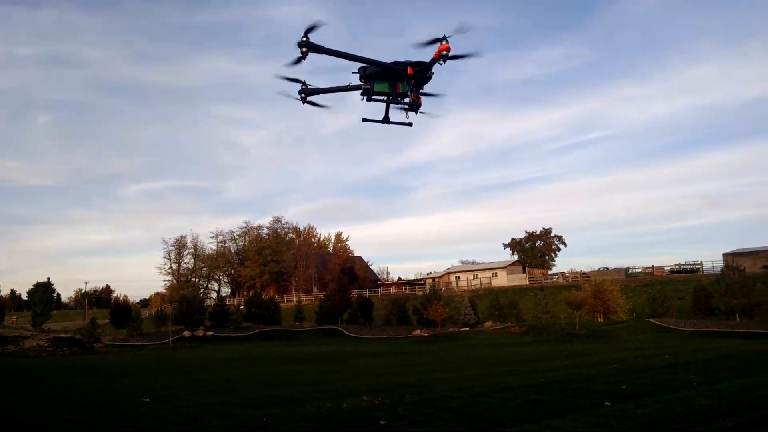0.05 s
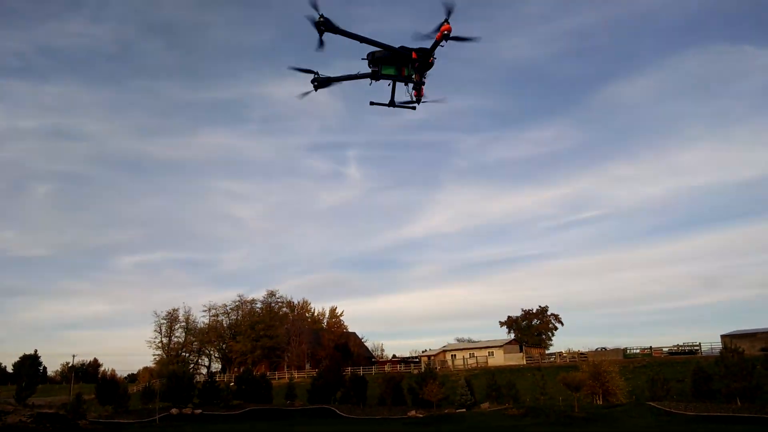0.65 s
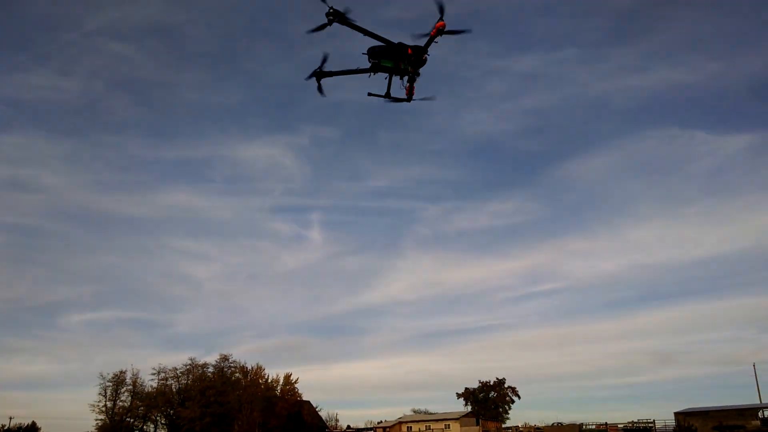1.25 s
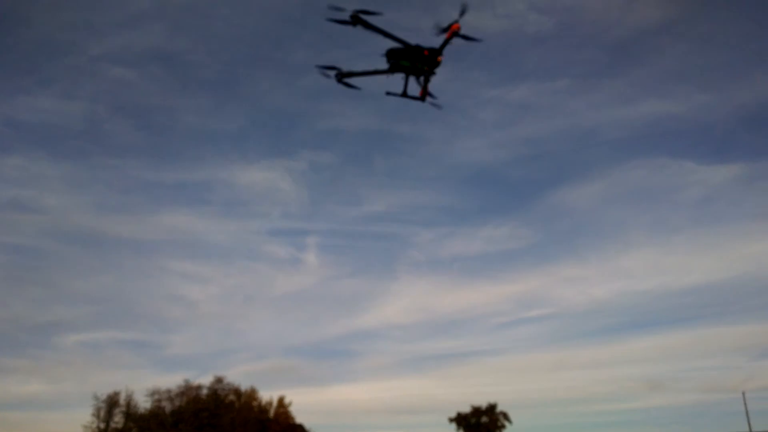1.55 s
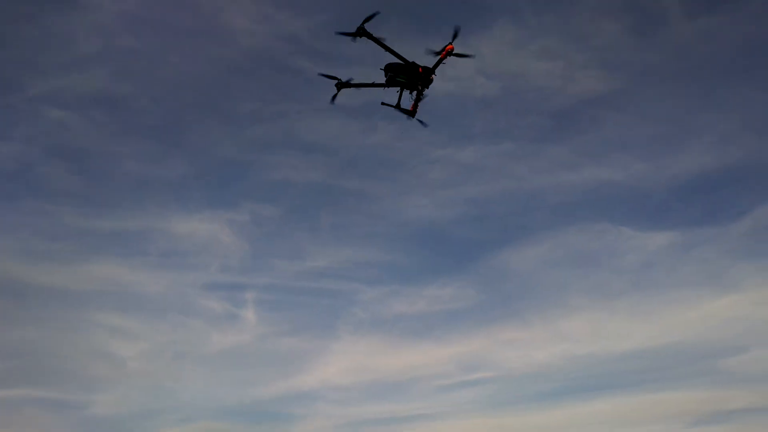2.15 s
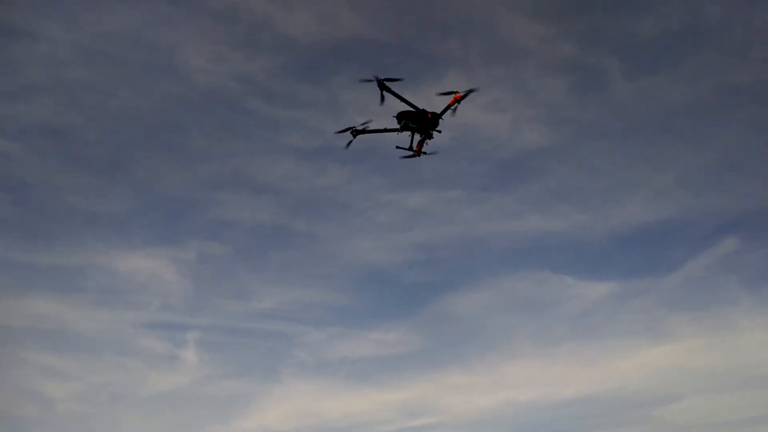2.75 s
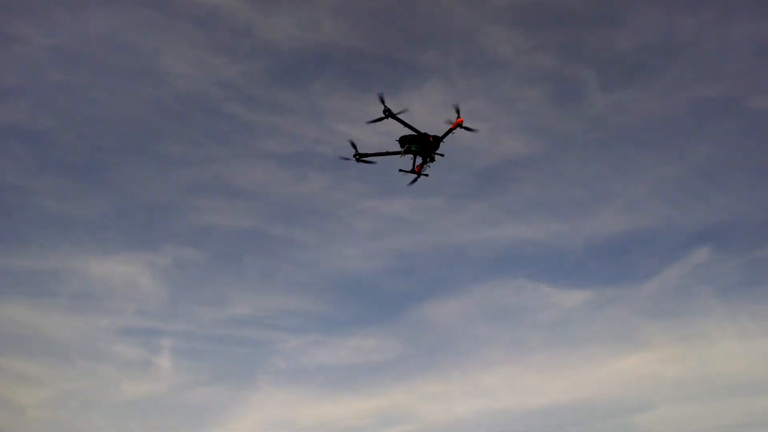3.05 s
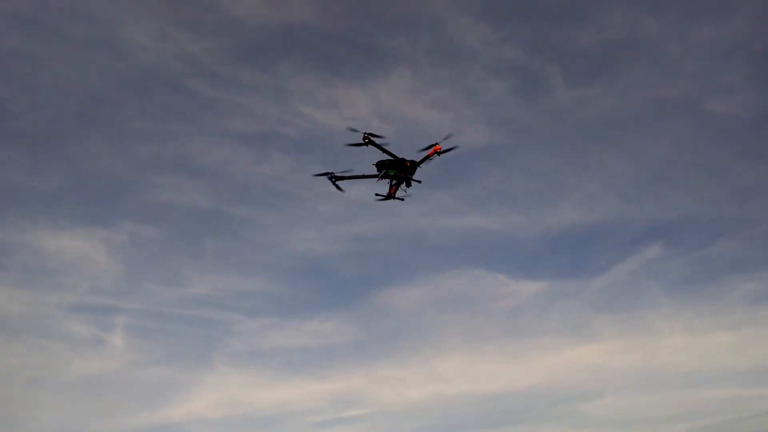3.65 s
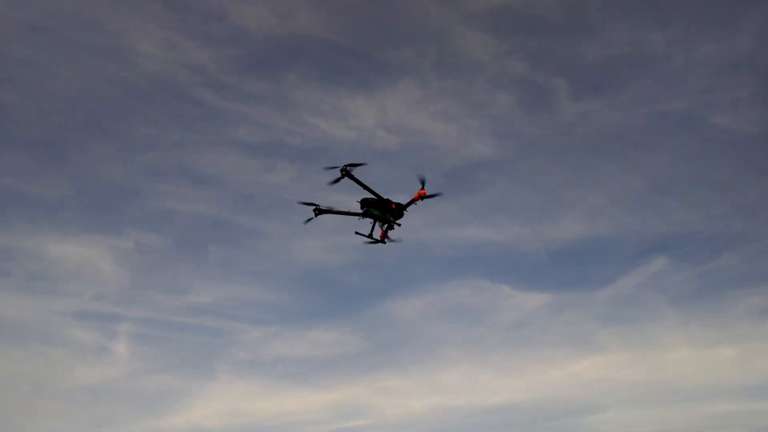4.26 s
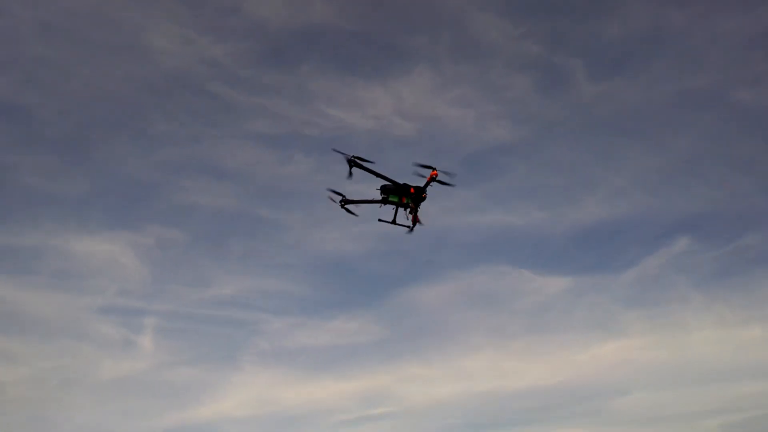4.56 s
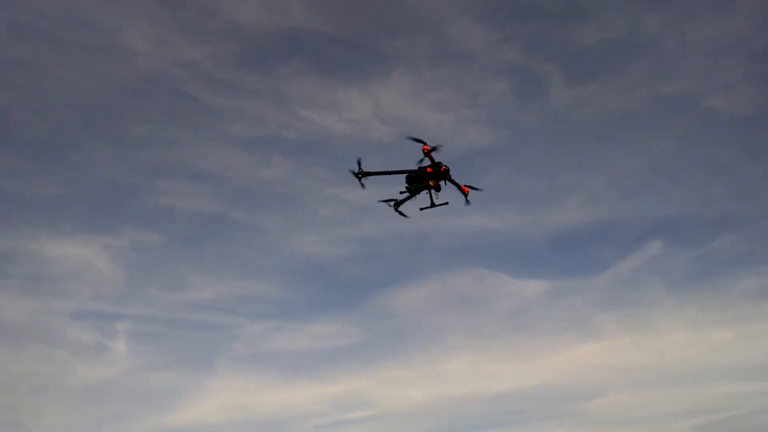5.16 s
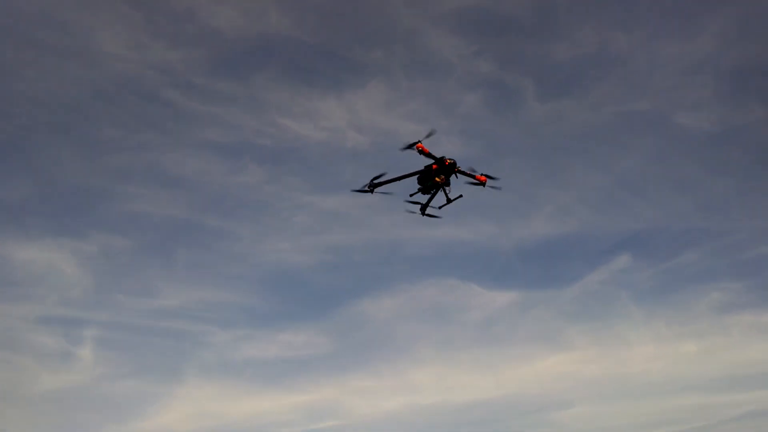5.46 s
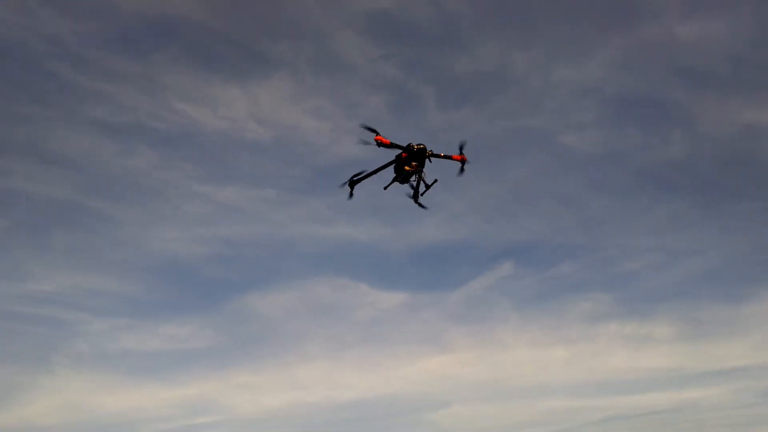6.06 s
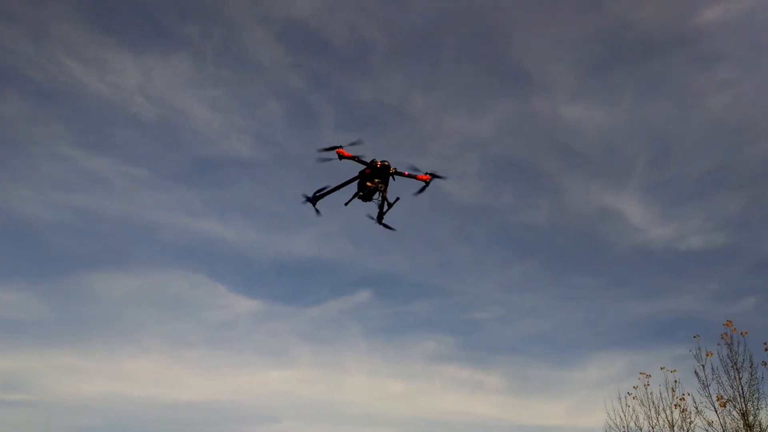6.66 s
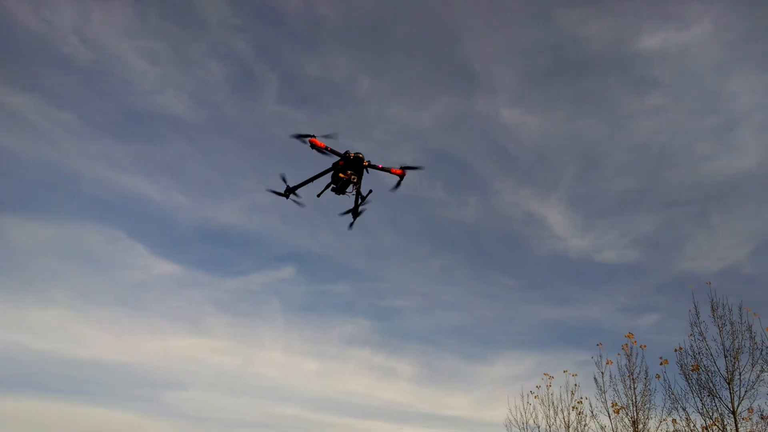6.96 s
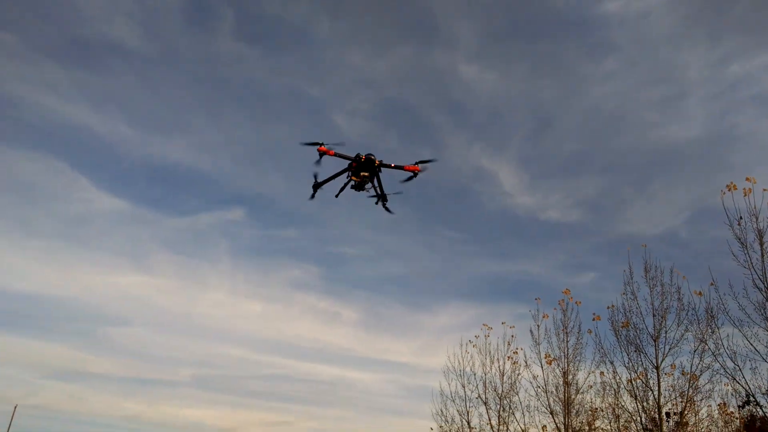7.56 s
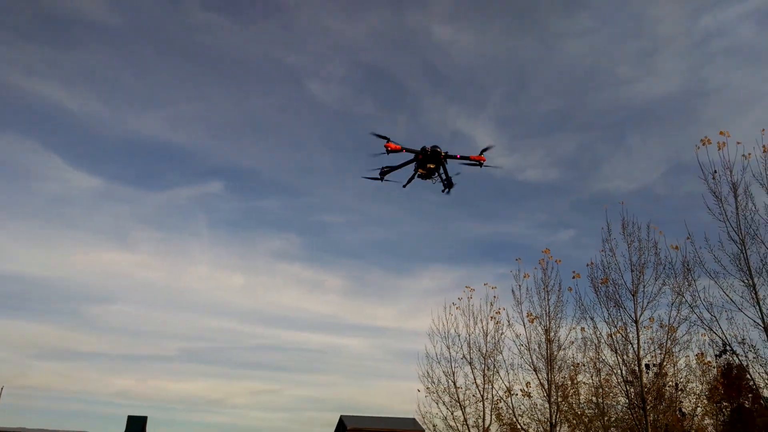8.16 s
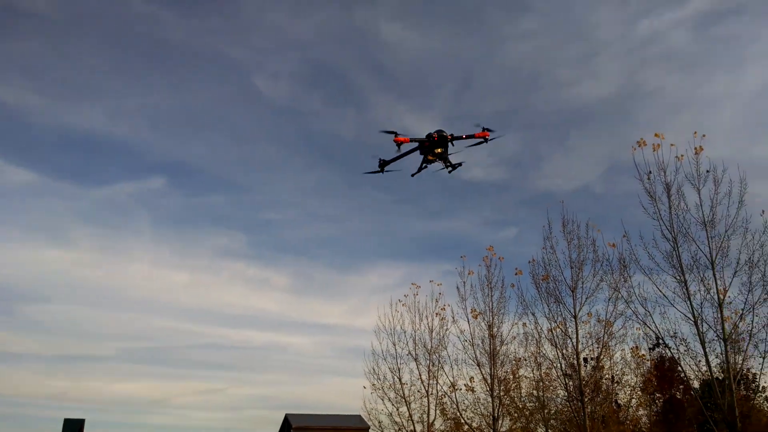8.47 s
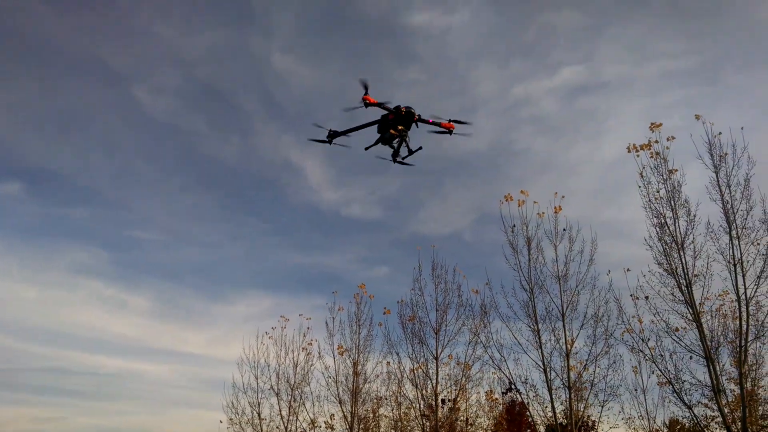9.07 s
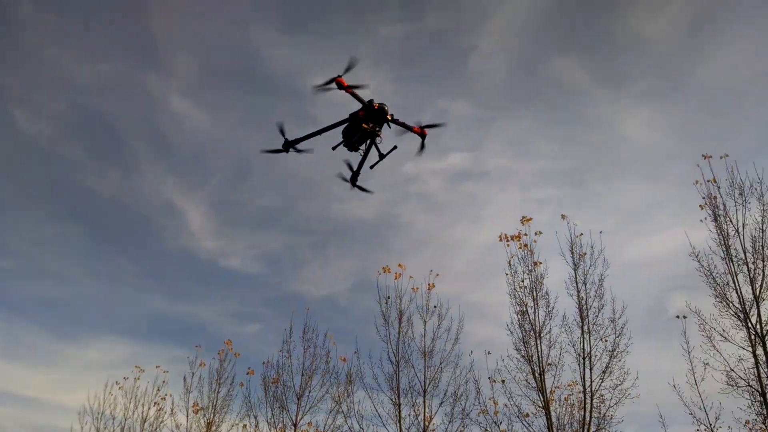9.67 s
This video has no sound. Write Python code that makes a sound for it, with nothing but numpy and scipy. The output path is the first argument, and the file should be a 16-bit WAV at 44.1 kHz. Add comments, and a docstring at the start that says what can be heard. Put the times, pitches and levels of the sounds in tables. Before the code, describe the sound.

A drone buzzes close overhead, its propellers wavering in pitch over rushing air and a thin, surging motor whine.

```python
"""Six-rotor drone over an open field

A few metres above a stereo microphone a drone manoeuvres. Its propellers buzz, beat and now and
then slap as they are steered, the wake rushes, the blade tips hiss, and the motors whine and surge
through a ringing housing. Far off, the low hum of a light aircraft sinks slowly in pitch."""
import sys
import numpy as np
from scipy import signal
from scipy.fft import rfft, irfft, next_fast_len
from scipy.io import wavfile
from scipy.ndimage import uniform_filter1d

SR = 44100
rng = np.random.default_rng(int(sys.argv[2]) if len(sys.argv) > 2 else 0)


def unload_wav(signal):
    """Save mono or channel-first audio to the path in sys.argv[1] as 16-bit WAV at rate SR, clipped to [-1, 1]."""
    wavfile.write(
        sys.argv[1],
        SR,
        np.round(np.clip(np.atleast_2d(signal).T, -1, 1) * 32767).astype(np.int16),
    )


N = 432621
T = np.arange(N) / SR

# resonances of the arms that carry the motors: (frequency [Hz], gain [dB])
ARM_RESONANCES = [(1650, -5), (1755, 14), (1795, 30), (1830, 17), (1870, -6), (2860, 7), (3500, 0),
                  (3720, 15), (3850, 13), (3980, 22), (4150, 13), (4300, -6)]


def drone(hover_hz=150, load_power=1.6, jitter_rad=0.21, hunting_hz=1.306, shudder=0.41, ragged_db=3):
    """Six rotors close overhead beat together, each with its pulses, whine and puffs of air noise."""
    # one row a rotor: (group, buzz [dB], brightness [dB/octave], odd harmonics [dB], whine [dB],
    # random drift [Hz])
    rotors = [("lead", 0, 0.45, 0, -6, 0.1001), ("slow", -1.9, 0, 0, 0, 0.059),
              ("middle", -3.5, -1.4, 0, -4.5, 0.081), ("high", -5, -1.7, -31, 1, .4),
              ("inner", -4.5, -1.1, 0, -9, .8), ("slow", -10, -0.58, 0, -15, 1.5)]
    # how much the rotors chop through their own wake: (time [s], churn [0-1])
    wake_churn = [(3.7, 0), (4.2, .9), (4.55, 0.95), (4.8, 0.31), (5.8, 0.22), (6.35, .45), (6.6, 0.11)]
    # third harmonic within the buzz: (time [s], gain [dB])
    third_gain = [(0, -1.5), (2, 0), (3, 1.5), (7, 3), (9.81, 6.5)]
    # magnetic pull in a motor, upper and lower tones: (multiple of the blade rate, level [dB])
    upper_orders = [(27, -4), (28, 5), (29, -14)]
    lower_orders = [(20.5, -10.5), (21, 2.5), (22, -20)]
    thump, hum, buzz, upper_whine, lower_whine, puffs = np.zeros((6, N))
    churn, third, rates = curves(wake_churn)[0], amp(curves(third_gain)[0]), blade_rates()
    for group, buzz_db, bright_db, odd_db, whine_db, drift_hz in rotors:
        # the inertia of the rotor rounds off each change of speed
        hz = uniform_filter1d(rates[group], size=2200) + drift_hz * wander(rate_hz=1.5)
        # in churned air the controller hunts, the pulses come early or late, and the motor shudders
        hz += hunting_hz * churn * wander(rate_hz=20.04)
        angle = 2 * np.pi * (np.cumsum(hz) / SR + rng.random())
        blade = angle + jitter_rad * churn * wander(rate_hz=25)
        shuddering = angle + shudder * (blade - angle)
        # churned air also loads each rotor unevenly and takes the edge off the faster ones
        load = amp(buzz_db + ragged_db * churn * wander(rate_hz=16)) * (hz / hover_hz) ** load_power
        edge = (hz / hover_hz - 1) * (1 - churn)
        thump += load * (hz / hover_hz) ** 2 * np.sin(blade)
        hum += amp(buzz_db) * np.sin(2 * blade)
        buzz += load * (hover_hz / hz) ** (2 * churn) * propeller(blade, edge, bright_db, odd_db, third)
        puffs += load * (np.cos(blade) + 3.1 * np.cos(2 * blade) + 0.19 * np.cos(blade / 2))
        upper_whine += amp(whine_db) * motor(angle, upper_orders, flutter=0.13)
        lower_whine += amp(whine_db) * motor(shuddering, lower_orders, flutter=0.72)
        if group == "lead":
            shake, slaps = arm_shake(angle), blade_slaps(blade)
    tones = blade_tones(thump, hum, buzz) + frame_whine(upper_whine, lower_whine)
    return tones + shake + slaps + air_rush(unit_rms(puffs), churn)


def blade_rates():
    """Blade-pass rate of each rotor group in Hz: the steered rate plus its share of the rocking."""
    # a hover, a hard turn, a gentler one, level flight, then a long turn that settles in a few swings:
    # (time [s], lead [Hz], slow [Hz], middle [Hz], high [Hz], inner [Hz])
    steering = [ (0, 158.3, 152.6, 152.5, 177.2, 155.6), (.3, 158, 153.2, 153.1, 175.2, 155.5),
                (.75, 153.1, 148.1, 150.3, 171.7, 150.2), (1.05, 152.9, 147.1, 149.9, 171.2, 152),
                (1.65, 155.7, 150.4, 154.5, 175.6, 154), (1.95, 152.5, 147.6, 150.9, 171.6, 150),
                (2.15, 152.2, 148.1, 149.3, 171.3, 149.3), (2.5, 147.5, 142.3, 144.8, 164.7, 143.1),
                (2.73, 141.2, 135.2, 139.4, 157.2, 137.9), (3.42, 149.1, 146.9, 148.3, 166.9, 145.3),
                (3.97, 150, 148.3, 149.9, 170.9, 147.1), (4.1, 156.6, 151.3, 152.8, 173.2, 154.7),
                (4.22, 174.8, 143, 145.6, 179.8, 161.8), (4.48, 182.5, 147.9, 149.2, 190, 165),
                (4.75, 169.6, 134, 138, 177, 155.6), (5.17, 164, 133, 136.6, 171.9, 151.9),
                (5.36, 147.8, 146.4, 146, 152.1, 147.2), (5.7, 150.4, 133.8, 149, 150.5, 146.9),
                (5.88, 162.2, 136.8, 142.1, 162.2, 146.7), (6.07, 165.6, 146.8, 149.6, 164.9, 146.9),
                (6.33, 154.2, 139.9, 144.7, 153.8, 146), (6.57, 144.5, 139.8, 145.9, 147.3, 143.3),
                (6.9, 150.9, 148, 151.2, 151.5, 149.1), (7.3, 153.1, 142.1, 150.8, 153.2, 145.5),
                (7.57, 151.2, 148, 150.5, 153.1, 149.5), (7.73, 168.4, 147, 148.3, 168.2, 146.9),
                (8.38, 165.2, 146.5, 145, 169, 146.1), (8.54, 165.1, 143.6, 151.3, 161.3, 145.7),
                (8.76, 157.3, 147.1, 150, 156, 147), (8.89, 160.4, 141.9, 150.5, 149.4, 145.5),
                (9.03, 154, 153, 148.9, 151.8, 149.7), (9.24, 152.1, 150.9, 149, 151.4, 149.9),
                (9.46, 145.4, 142.9, 146.9, 148.9, 145.5), (9.81, 151.3, 146.9, 152.8, 153.2, 147.8)]
    # the controller overshoots and the craft rocks: (start [s], length [s], rate [Hz], depth [Hz])
    overshoot = (7.86, .82, 3.35, 5.1)
    # rotors that are steered together: name -> share of the rocking
    groups = {"lead": 0.46, "slow": -0.81, "middle": 0.74, "high": -0.55, "inner": 0}
    start, length, rate, depth_hz = overshoot
    since = np.clip(T - start, 0, length)
    rocking = depth_hz * np.sin(np.pi * since / length) * np.sin(2 * np.pi * rate * since)
    return {name: hz + share * rocking for (name, share), hz in zip(groups.items(), curves(steering))}


def propeller(angle, edge, bright_db, odd_db, third, sharpen=0.86, gusty=0.32, uneven_db=-23):
    """Each passing blade makes a pressure pulse, sharper above hover speed; eddies shake its overtones."""
    phase = (angle % (4 * np.pi)).astype(np.float32)
    buzz = np.zeros(N)
    for k in range(3, 17):
        strength = amp(bright_db * np.log2(k / 2) + odd_db * (k % 2))
        strength *= 1 + gusty * np.sqrt(k / 2) * wander(rate_hz=12)
        strength *= third if k == 3 else 1 + sharpen * np.log2(k / 3) * edge
        buzz += strength * np.sin(k * phase + k / 10 * rng.standard_normal())
    return buzz * (1 + amp(uneven_db) * np.cos(phase / 2))  # unlike blades add half orders


def blade_tones(thump, hum, buzz, thump_trim_db=-5.5, buzz_trim_db=-0.5):
    """The blade pulses as heard from the ground: thrust thump, octave hum and the buzz above them."""
    # the two lowest blade tones: (time [s], relative thump level [dB], hum level [dB])
    low_levels = [(0, -35.5, -33.5), (2.7, -38, -35.5), (3.6, -34.5, -35), (4.45, -26.5, -30.5),
                  (5.75, -39, -33), (6.4, -34.5, -27.5), (6.7, -30, -29), (7.2, -33.5, -29),
                  (7.9, -30.5, -29.5), (9, -29, -30), (9.81, -31, -28.5)]
    # buzz beamed at the microphone as the craft tilts: (time [s], relative level [dB])
    buzz_levels = [(0, -28), (.85, -26), (1.03, -29), (1.3, -25), (2.4, -25), (2.75, -29.5), (2.9, -26),
                   (4.1, -27), (4.28, -31.5), (4.45, -27.5), (5.6, -27), (6.4, -24.5), (6.9, -24),
                   (7.2, -24.5), (7.85, -25), (8.7, -26.5), (9.42, -22.5), (9.81, -27)]
    # colours of the hum and of the buzz: (frequency [Hz], gain [dB])
    hum_colour = [(290, 0.5), (335, 7), (375, -4)]
    buzz_colour = [(300, 18), (420, -0.5), (510, 5), (590, 5), (680, 4), (745, 0.5), (840, -3), (915, -3.5),
                   (1020, -1), (1150, -4), (1800, -16.5), (2400, -8)]
    (thump_db, hum_db), (buzz_db,) = curves(low_levels), curves(buzz_levels)
    tones = amp(thump_db + thump_trim_db) * levelled(thump, seconds=0.2)
    tones += amp(hum_db) * levelled(coloured(hum, hum_colour), seconds=0.34)
    return tones + amp(buzz_db + buzz_trim_db) * levelled(coloured(buzz, buzz_colour), seconds=0.18)


def blade_slaps(blade):
    """A blade cuts its neighbour's tip vortex: short runs of sharp suction pulses, one at each pass."""
    # runs of slaps: (start [s], length [s], level [dB])
    runs = [(6.3, 0.18, -29), (6.846, 0.097, -23.5), (6.991, 0.031, -22.5), (7.041, 0.025, -20),
            (7.65, 0.66, -27), (9.02, 0.31, -30), (9.584, 0.096, -25)]
    # colour of a slap: (frequency [Hz], gain [dB])
    slap_colour = [(300, -9), (550, 4), (700, -5.5), (1000, -0.5), (1300, -15), (2400, -21)]
    level = np.zeros(N)
    for start, length, db in runs:
        add(level, start, amp(db) * swell(length, edge_s=0.014))
    phase = (blade % (2 * np.pi)).astype(np.float32)
    suction = -sum(np.cos(k * phase) for k in range(2, 16))
    return level * unit_rms(coloured(suction, slap_colour))


def air_rush(puffs, churn, wake_trim_db=4.5, tip_trim_db=6.0, eddies_db=-35):
    """The wake, struck eddies and the blade tips make turbulent noise that pulses with the blades."""
    # air noise sent to the ground, relative levels: (time [s], wake rush [dB], tip hiss [dB])
    noise_levels = [(0.1, -30, -21.5), (.21, -34, -24), (0.9, -33, -23), (1.0, -34.5, -25),
                    (1.55, -33, -23), (2.7, -33.5, -27), (3.3, -31, -27), (3.55, -34, -26),
                    (4.67, -32.5, -25), (5.63, -34.5, -28.5), (5.79, -31, -27), (6.72, -34, -24),
                    (6.91, -30, -22), (7.1, -35.5, -25), (7.54, -32.5, -23.5), (8.44, -37, -29.5),
                    (9.15, -35, -25), (9.76, -28, -22.5)]
    # colours of the wake and of eddies struck by the blades: (frequency [Hz], gain [dB])
    wake_colour = [(30, -31), (70, -26), (130, -2), (220, -16), (350, -3.5), (600, 0), (1100, 1), (1800, 4),
                   (2200, -4), (3200, -1), (4200, 3), (4600, -4.5), (8000, -55)]
    eddy_colour = [(50, -27), (120, 18), (220, -7), (400, -10), (600, -6), (1200, 13), (2500, -45)]
    wake_db, tip_db = curves(noise_levels)
    wake = amp(wake_db + wake_trim_db) * turbulence(wake_colour)
    wake += amp(eddies_db) * churn * turbulence(eddy_colour)
    tips = amp(tip_db + tip_trim_db) * tip_hiss()
    wake_swish = unit_rms(np.exp(0.195 * puffs))
    flicker = 0.089 * wander(rate_hz=17)
    tip_swish = unit_rms(np.exp(0.135 * puffs + flicker))
    return wake * wake_swish + tips * tip_swish


def tip_hiss(top_hz=11500):
    """Noise shed by the blade tips; its top treble comes and goes as the craft tilts."""
    # colour of the hiss: (frequency [Hz], gain [dB])
    tip_colour = [(2000, -19.5), (4000, -10), (5500, -4.5), (7000, -10), (8500, -5.5), (10000, -1),
                  (12000, -0.8), (15400, 1.5)]
    # top treble within the hiss: (time [s], gain [dB])
    sheen = [(0, 0), (5.2, 1.5), (6.3, 1), (7.3, -6), (8.3, 3.5), (9.81, -0.5)]
    hiss = turbulence(tip_colour)
    top = filtered(hiss, lambda hz: 1 - 1 / (1 + (hz / top_hz) ** 10))
    return hiss - top + amp(curves(sheen)[0]) * top


def turbulence(colour):
    """Stereo air noise of unit rms, partly alike at the two microphone ports."""
    # likeness of the noise at the ports: (frequency [Hz], correlation [0-1])
    likeness = [(40, .4), (150, .9), (400, .98), (1300, .99), (2200, .66), (3000, .6), (3450, .99),
                (4100, .99), (4900, .25), (6500, .5), (7800, .7), (8700, .4), (10400, .82), (15000, .88)]
    left, unrelated = rng.standard_normal((2, N))
    alike = lambda hz: np.clip(at_frequency(likeness, hz), 0, 1)
    right = filtered(left, alike) + filtered(unrelated, lambda hz: np.sqrt(1 - alike(hz) ** 2))
    return unit_rms(coloured(np.array([left, right]), colour))


def motor(angle, orders, flutter):
    """Magnets passing the stator teeth sing at high multiples of the shaft speed."""
    phase = (angle % (4 * np.pi)).astype(np.float32)
    whine = sum(amp(db) * np.sin(k * phase + rng.uniform(0, 2 * np.pi)) for k, db in orders)
    return whine * (1 + flutter * wander(rate_hz=12))


def frame_whine(upper, lower):
    """The whine flares whenever a motor's speed carries it through a resonance of housing or arms."""
    # resonances of the motor housing: (frequency [Hz], gain [dB])
    housing = [(3300, -22), (3750, -12), (4000, 14), (4130, 15), (4220, 17.5), (4320, 7.5), (4480, -16)]
    # upper whine as the craft turns: (time [s], level [dB])
    upper_levels = [(0, -26), (.3, -30), (.5, -30), (.9, -29), (1.0, -33), (1.15, -29), (1.65, -27),
                    (2.3, -32.5), (2.7, -38), (3.8, -29.5), (4.2, -38), (8.6, -37), (9.2, -33), (9.81, -36)]
    # the lower whine comes out as the craft shows its other side: (time [s], gain [dB])
    lower_gains = [(0, -71), (3.9, -58), (4.47, -44.5), (4.68, -54), (5.1, -57), (6.05, -44), (6.8, -49),
                   (8.3, -56), (8.6, -45), (9.81, -49)]
    from_housing = amp(curves(upper_levels)[0]) * unit_rms(coloured(upper, housing))
    from_arms = amp(curves(lower_gains)[0]) * coloured(lower, ARM_RESONANCES)
    return from_housing + from_arms


def motor_whistles(waver_hz=5, flutter_db=1.6):
    """Each surge is one motor tone arching through a frame resonance, wavering in pitch and level."""
    # surges: (start [s], length [s], first pitch [Hz], middle pitch [Hz], last pitch [Hz], level [dB])
    surges = [ (3.899, 0.11, 4130, 4170, 4190, -24.5), (4.028, 0.103, 4150, 4230, 4325, -31),
              (4.39, .2, 4036, 4125, 4082, -32), (4.639, 0.38, 2950, 2867, 2890, -34.5),
              (5.311, 0.36, 4080, 4175, 4126, -31.5), (5.649, 0.16, 4145, 4203, 4310, -28),
              (5.99, 0.21, 4114, 4195, 4110, -35.5), (6.35, 0.12, 4330, 4210, 4046, -29),
              (6.839, 0.19, 4166, 4255, 4202, -34), (7.033, 0.49, 4190, 4245, 4212, -36.5),
              (8.029, .12, 4096, 4225, 4175, -31.5), (8.15, .17, 4055, 4183, 4115, -32),
              (8.318, .14, 4150, 4240, 4204, -31.5), (8.44, .2, 4012, 4224, 4250, -36),
              (8.62, .24, 4260, 4185, 4305, -34), (8.961, 0.093, 4240, 4260, 4074, -29),
              (9.061, 0.0921, 4320, 4210, 4180, -31), (9.15, 0.2, 4110, 4234, 4170, -30.5),
              (9.37, 0.26, 4103, 4120, 4180, -34), (9.601, 0.21, 4162, 4258, 4263, -36)]
    whistles, waver = np.zeros(N), waver_hz * wander(rate_hz=16)
    for start, length, first_hz, middle_hz, last_hz, db in surges:
        level = amp(db) * swell(length, edge_s=0.035)
        arch = np.polyfit([0, .5, 1], [first_hz, middle_hz, last_hz], 2)
        hz = np.polyval(arch, np.linspace(0, 1, len(level)))
        hz += np.interp(start + T[:len(level)], T, waver)
        angle = 2 * np.pi * (np.cumsum(hz) / SR + rng.random())
        add(whistles, start, np.sqrt(2) * level * np.sin(angle))
    return whistles * amp(flutter_db * wander(rate_hz=15))


def arm_shake(angle, ring_db=-13, throb_db=-52, unsteady=0.41):
    """Odd shaft orders shake an arm: a faint throb, a low side tone and a ring at its resonances."""
    # how hard the slightly unbalanced lead propeller shakes its arm: (time [s], level [dB])
    shake_levels = [(0, -39), (.45, -44), (1.6, -49.5), (8.7, -49.5), (9.81, -57)]
    shaft = angle / 2  # two blades pass in each turn
    throb, side_tone = amp(throb_db) * np.sin(shaft), np.sin(3 * shaft)
    ring = amp(ring_db) * coloured(np.sin(23 * shaft), ARM_RESONANCES)
    shake = throb + amp(curves(shake_levels)[0]) * (side_tone + ring)
    return shake * (1 + unsteady * wander(rate_hz=6.6))


def far_aircraft(fading_db=2.0):
    """Exhaust orders of a distant piston engine, each fading in and out on its way through the air."""
    # the engine as heard from the field: (time [s], crank rate [Hz], level [dB])
    flight = [(0, 22.6, -60), (1.8, 20.3, -49), (3.3, 15.2, -40), (5.8, 17.5, -42.5), (6.8, 17.2, -40.5),
              (8.2, 15.9, -48), (9.81, 15.2, -47)]
    # exhaust tones: (multiple of the crank rate, relative level [dB])
    exhaust = [(2, -7), (4, -2), (5, 6), (6, -4), (7, 6), (9, -6)]
    crank_hz, level_db = curves(flight)
    angle = 2 * np.pi * np.cumsum(crank_hz) / SR
    engine = np.zeros(N)
    for k, db in exhaust:
        strength = amp(db + fading_db * wander(rate_hz=4.1))
        engine += strength * np.sin(k * angle + rng.uniform(0, 2 * np.pi))
    return amp(level_db) * unit_rms(engine)


def amp(db):
    """Decibels to gain."""
    return 10 ** (np.asarray(db) / 20)


def unit_rms(x):
    """Scales to unit rms."""
    return x / np.sqrt(np.mean(x ** 2) + 1e-20)


def levelled(x, seconds):
    """Evens out swells slower than the given time and keeps the quicker beats."""
    size = int(seconds * SR)
    power = uniform_filter1d(uniform_filter1d(x ** 2, size), size)
    return x / np.sqrt(abs(power) + 1e-12)


def curves(table):
    """The columns of a time table, sample by sample."""
    times, *columns = np.transpose(table)
    return [np.interp(T, times, column) for column in columns]


def at_frequency(table, hz):
    """Reads a table on a logarithmic frequency axis."""
    frequencies, values = np.transpose(table)
    return np.interp(np.log(hz + 1e-3), np.log(frequencies), values)


def filtered(x, response):
    """Applies a response given as a function of frequency."""
    size = next_fast_len(N + 2048)
    return irfft(rfft(x, size) * response(np.fft.rfftfreq(size, 1 / SR)), size)[..., :N]


def coloured(x, colour):
    """Shapes x by a table of (frequency [Hz], gain [dB])."""
    return filtered(x, lambda hz: amp(at_frequency(colour, hz)))


def wander(rate_hz, size=4096):
    """Slow random motion of unit rms, up to about the given rate."""
    hz = np.fft.rfftfreq(size, T[-1] / size)
    slow = irfft(rfft(rng.standard_normal(size)) / (1 + (hz / rate_hz) ** 2))
    return np.interp(T, np.linspace(0, T[-1], size), unit_rms(slow))


def add(mix, start_s, sound):
    """Mixes a sound in at the given time."""
    part = mix[round(start_s * SR):][:len(sound)]
    part += sound[:len(part)]


def swell(length, edge_s):
    """A smooth rise, a hold and a smooth fall."""
    t = np.arange(0, length, 1 / SR)
    return np.sin(np.pi / 2 * np.clip(np.minimum(t, length - t) / edge_s, 0, 1))


def scene():
    """An open field: the drone a few metres overhead, the aircraft far away."""
    return drone() + motor_whistles() + far_aircraft()


def record(dry, cutoff_hz=15650):
    """The stereo microphone shifts phase and level between its ports; the top treble is cut off."""
    # phase between the ports: (frequency [Hz], lead of the left [rad])
    port_phase = [(50, 1.2), (300, .5), (900, .03), (1400, -.03), (2000, -1.1), (2550, -3.1), (3400, -6.25),
                  (4450, -6.3), (5100, -9.2), (7700, -15.7), (15150, -34.6)]
    # balance of the ports: (frequency [Hz], left minus right [dB])
    port_balance = [(60, -1.5), (150, -4), (300, -2), (1000, -2), (1800, 1), (2700, -2.5), (3400, -2),
                    (4200, 0.5), (5200, 2.5), (7500, 0), (9500, -1.5), (15000, -1)]

    def ports(hz):
        lead = np.interp(hz, *np.transpose(port_phase))
        lean = amp(at_frequency(port_balance, hz) / 2)
        return np.array([lean * np.exp(1j * lead), 1 / lean])
    lowpass = signal.firwin(511, cutoff_hz, window=("kaiser", 9), fs=SR)
    return signal.oaconvolve(filtered(dry, ports), lowpass[None], "same")


dry = scene()
out = record(dry)
unload_wav(out)
```